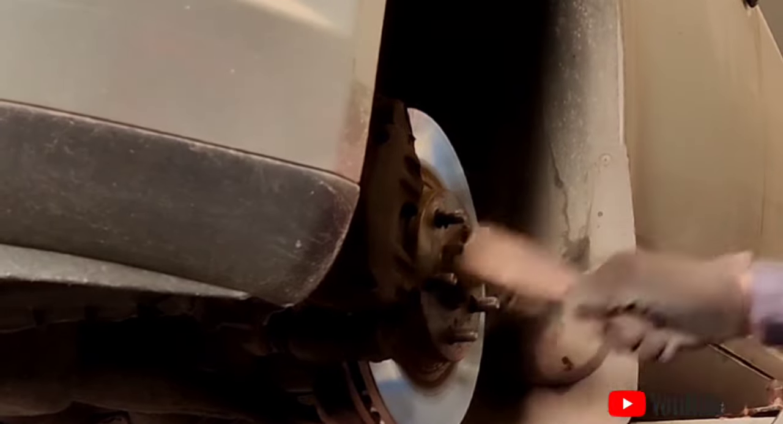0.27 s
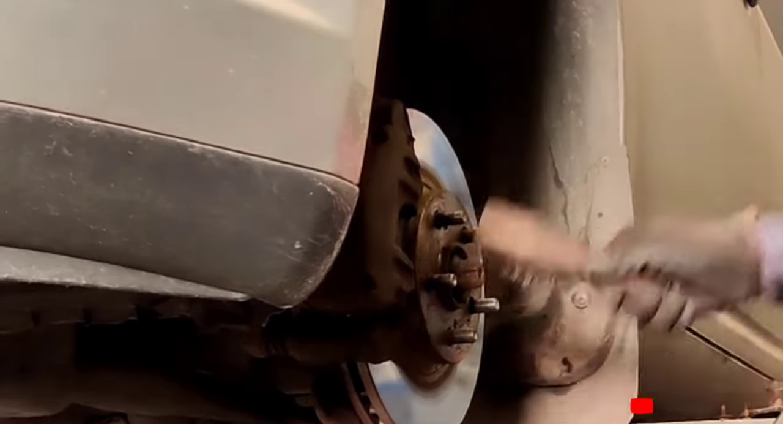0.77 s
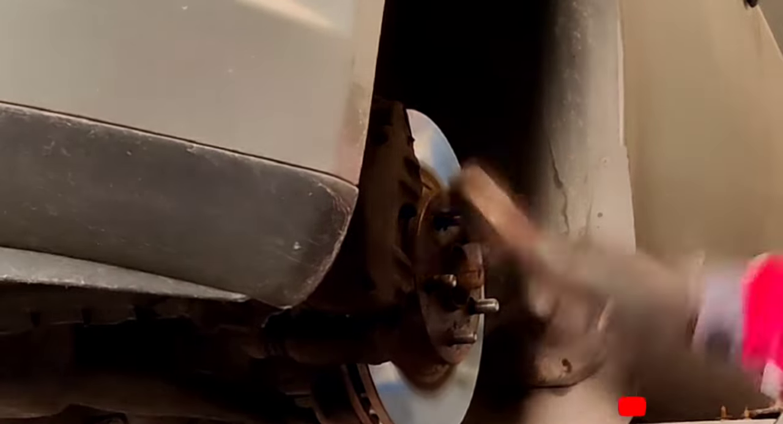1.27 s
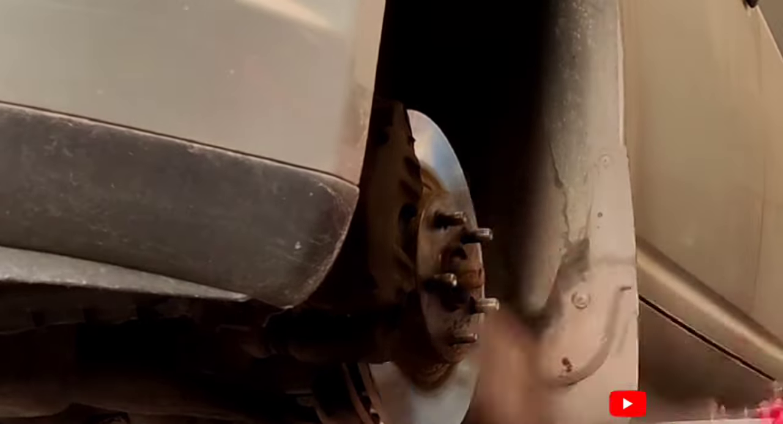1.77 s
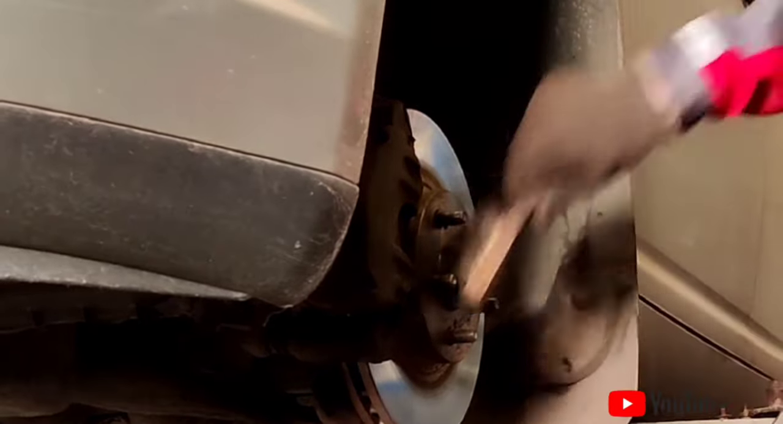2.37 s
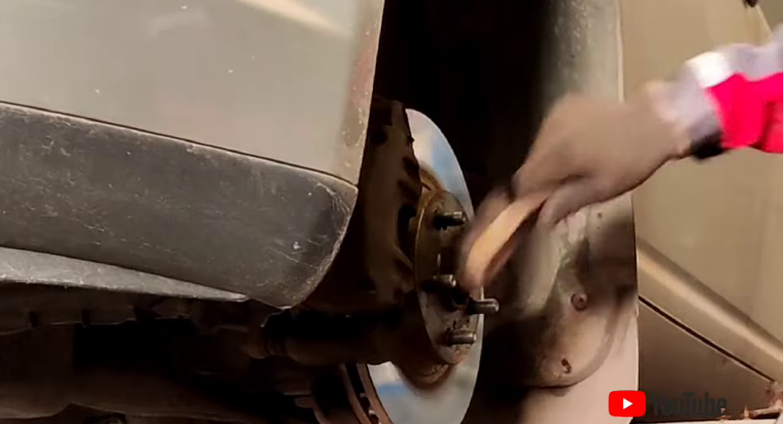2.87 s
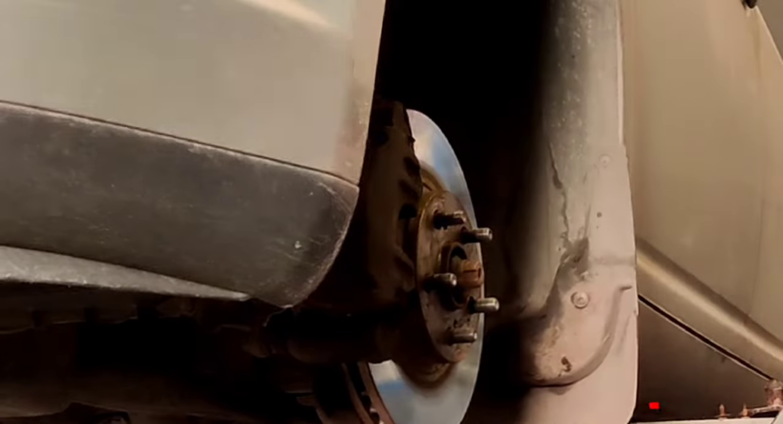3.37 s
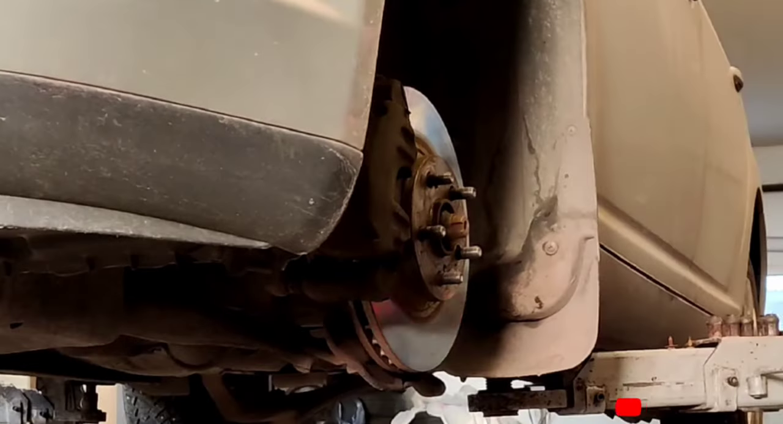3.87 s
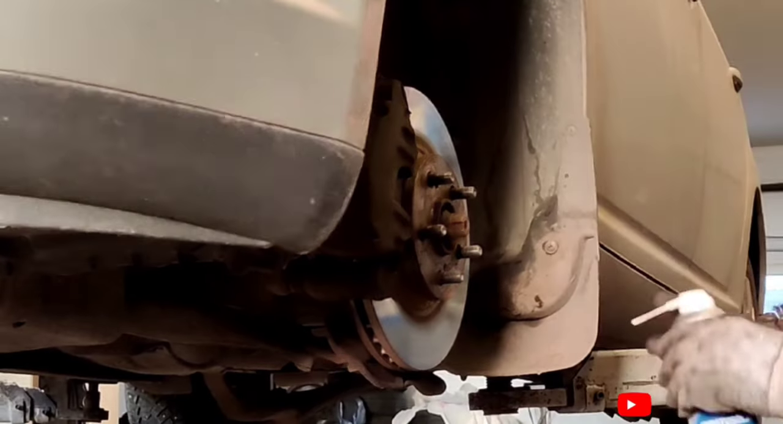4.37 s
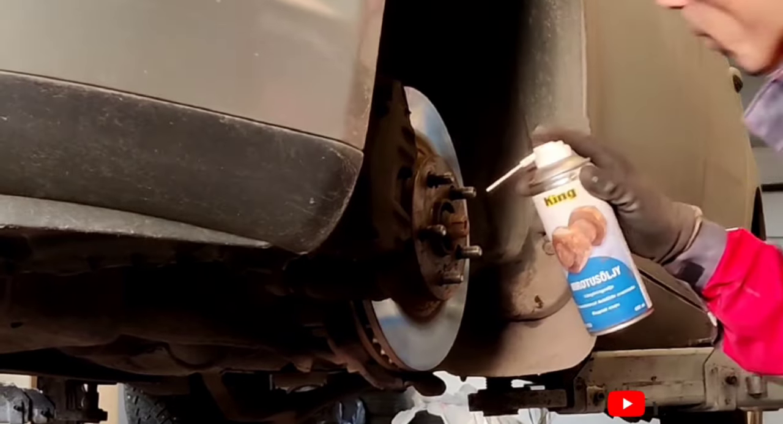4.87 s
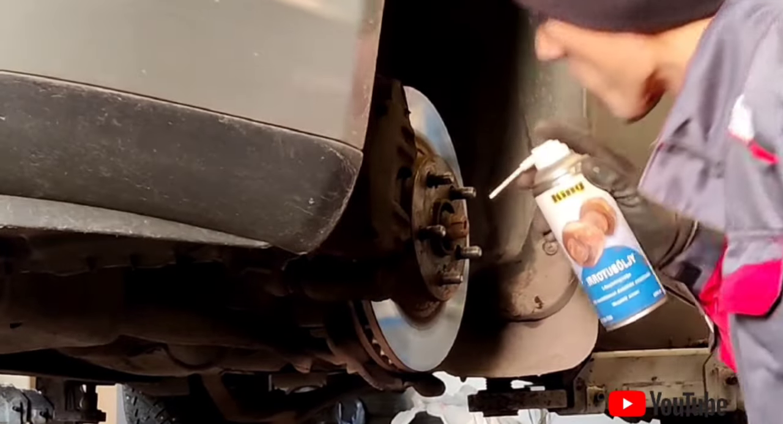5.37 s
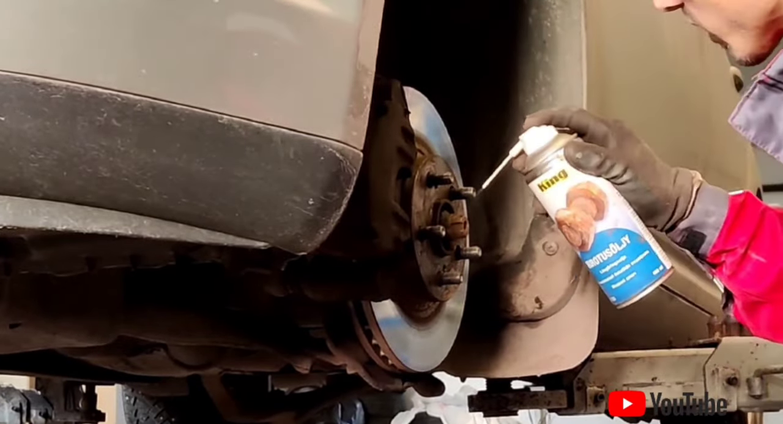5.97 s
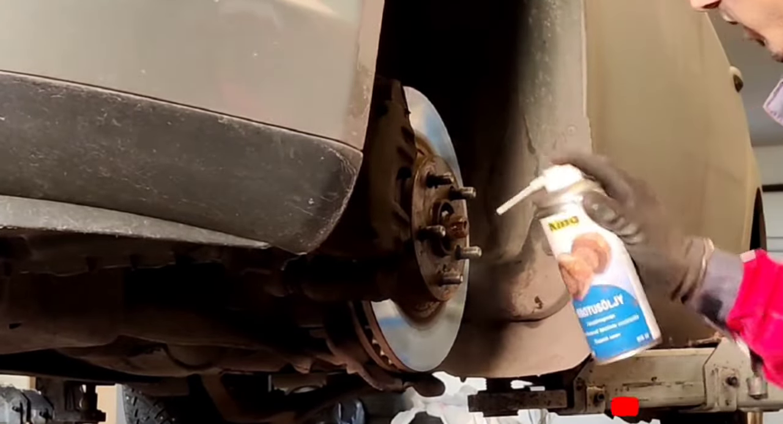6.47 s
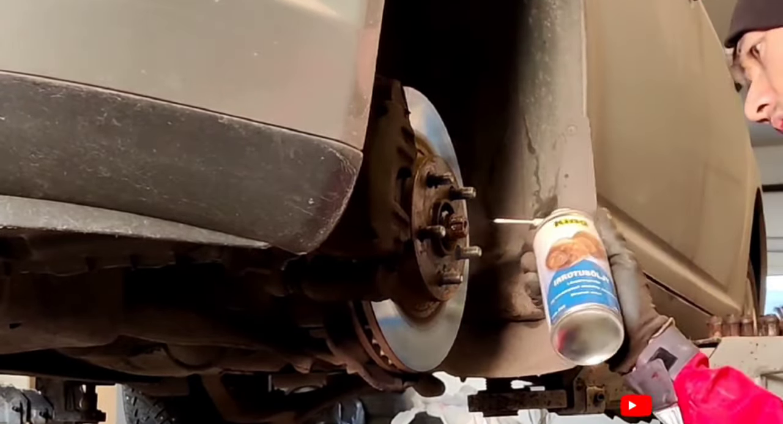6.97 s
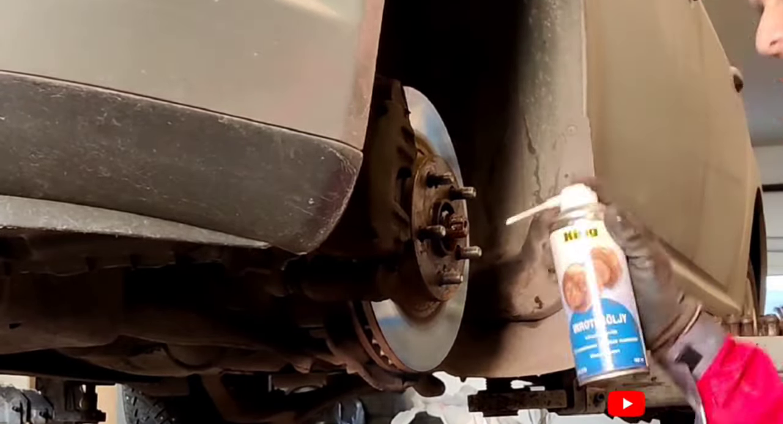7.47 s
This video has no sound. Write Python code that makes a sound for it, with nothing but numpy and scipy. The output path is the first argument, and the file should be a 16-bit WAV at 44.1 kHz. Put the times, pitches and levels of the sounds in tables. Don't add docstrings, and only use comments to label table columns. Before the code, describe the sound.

In a reverberant garage, a hand wire brush scrubs a rusty wheel hub with short raspy strokes, its wooden back clacking on studs and the iron ringing faintly. A car panel booms deeply, then come hard knocks and a longer, quicker scrub. After a tiny silent gap, a spray can rattles, cloth swishes and soft airy puffs follow. A low machine throb and hum lie underneath; the small microphone sounds slightly dull.

```python
import sys
import numpy as np
from scipy import signal
from scipy.fft import rfft, irfft, next_fast_len
from scipy.io import wavfile
from scipy.ndimage import uniform_filter1d, map_coordinates

SR = 44100
rng = np.random.default_rng(int(sys.argv[2]) if len(sys.argv) > 2 else 0)


def materialize(psi):
    bounded = np.clip(np.atleast_2d(psi).T, -1, 1)
    quanta = np.round(bounded * 32767).astype(np.int16)
    wavfile.write(sys.argv[1], SR, quanta)


def nominal_scale(level):
    x = np.asarray(level, float) / 20
    return 10 ** x


N = 339746

# (start [s], end [s])
SILENCE = (4.1879, 4.2177)
# (frequency [Hz], level [dB])
TOP_HISS = [(4710, -16), (8000, -1.5), (10400, -11.5), (11500, -7.5), (14500, -6), (15700, -22)]


def unit(x):
    return x / np.sqrt(np.mean(x ** 2) + 1e-20)


def along(points, hz):
    f, v = np.transpose(points)
    return np.interp(np.log(hz + 1), np.log(f + 1), v)


def curves(rows):
    s, *cols = np.transpose(rows)
    return [np.interp(np.arange(N) / SR, s, c) for c in cols]


def wobble(rate):
    knots = rng.standard_normal(int(N * rate / SR) + 4)
    return map_coordinates(knots, [np.arange(N) * rate / SR])


def filtered(x, response):
    m = next_fast_len(N + SR // 2)
    return irfft(rfft(x, m) * response(np.fft.rfftfreq(m, 1 / SR)), m)[:N]


def coloured(x, spectrum):
    return filtered(x, lambda hz: nominal_scale(along(spectrum, hz)))


def modes(table):
    def response(f):
        total = 0
        for k, (centre, width, db) in enumerate(table):
            total = total + (-1) ** k * nominal_scale(db) * 1j * f * width / (centre * centre - f * f + 1j * f * width)
        return total
    return response


def muffled(x, top_hz):
    return signal.sosfilt(signal.butter(6, top_hz, fs=SR, output="sos"), x)


def grit(spread_db, clump_db):
    size_db = spread_db * rng.exponential(size=N) + clump_db * (wobble(60) + wobble(250))
    return unit(rng.standard_normal(N) * nominal_scale(size_db))


def patchy(x, depth_db):
    z = signal.stft(x, nperseg=256)[2]
    field = uniform_filter1d(rng.standard_normal(z.shape), size=4, axis=0)
    field = uniform_filter1d(field, size=8, axis=1)
    return unit(signal.istft(z * nominal_scale(depth_db * unit(field)), nperseg=256)[1][:N])


def gesture(rise, hold, db_per_s, sag_db=0):
    t = np.arange(SR) / SR
    sag = sag_db * np.clip((t - rise) / max(hold, .002), 0, 1)
    fall_db = sag + db_per_s * np.maximum(t - rise - hold, 0)
    return np.sin(np.pi / 2 * np.clip(t / max(rise, .002), 0, 1)) ** 2 * nominal_scale(-fall_db)


def add(track, s, sound):
    part = track[round(s * SR):][:len(sound)]
    part += sound[:len(part)]


def hall():
    # (time [s], deep throb [dB], hum [dB])
    load = [(0.0, -42.5, -46), (0.32, -47.5, -48.5), (0.81, -39.5, -48.5), (1.16, -45, -45.5),
            (1.63, -45.5, -50.5), (1.84, -54, -42), (2.51, -39.5, -50.5), (3.22, -40.5, -45),
            (3.39, -30.5, -49), (3.95, -42.5, -49), (4.42, -46, -48.5), (4.82, -77, -47), (5.0, -44.5, -50),
            (5.9, -74, -44.5), (6.0, -47, -50.5), (6.28, -59.5, -50.5), (7.03, -61, -47.5),
            (7.7, -71, -50.5)]
    # (frequency [Hz], density [dB per Hz])
    hum_spectrum = [(24, -47), (40, -0.5), (68, 0), (77, -8.5), (86, -18), (98, -3.5), (118, -11),
                    (140, -19.5), (180, -57), (310, -120)]
    # (frequency [Hz], density [dB per Hz])
    air_spectrum = [(76, -48), (130, 0.5), (202, -10), (321, -27), (479, -22), (673, -13.5), (1200, -33),
                    (2580, -35), (5880, -31.5), (7780, -39.5), (8950, -48.5), (12700, -46.5), (13200, -57),
                    (15700, -66)]
    hum_sway_db, air_db, air_sway_db = 1, -61, 1
    throb_hz, throb_sway_hz = 27, 1
    throb_db, hum_db = curves(load) + hum_sway_db * wobble(3.24)
    noise = rng.standard_normal((3, N))
    phase = 2 * np.pi * np.cumsum(throb_hz + throb_sway_hz * wobble(8.2)) / SR
    throb = unit(np.sin(phase) * nominal_scale(0.58 * wobble(6.0)))
    hum = coloured(noise[1], hum_spectrum)
    hum /= np.sqrt(np.abs(uniform_filter1d(hum ** 2, size=SR // 4)))
    air_gain = nominal_scale(air_db + air_sway_db * wobble(3.5))
    air = air_gain * unit(coloured(patchy(noise[2], depth_db=2.2), air_spectrum))
    return nominal_scale(throb_db) * throb + nominal_scale(hum_db) * hum + air


def garage(x):
    # (frequency [Hz], t60 [s])
    decay = [(150, 0.64), (1000, 0.41), (3000, 0.62), (7000, 0.29), (14000, 0.16)]
    out, step = np.zeros(N + 2 * SR), SR // 8
    for start in range(0, N, step):
        hz, t, z = signal.stft(rng.standard_normal(SR // 2), SR, nperseg=256)
        t60 = np.maximum(along(decay, hz), .05)[:, None]
        tail = signal.istft(z * nominal_scale(-60 * t / t60), SR, nperseg=256)[1]
        tail = tail / np.linalg.norm(tail)
        add(out, start / SR + .004, signal.fftconvolve(x[start:start + step], tail))
    return out[:N]


def rustle():
    # (start [s], rise [s], hold [s], level [dB])
    swishes = [
        (4.325, 0.011, .01, -64),
        (4.51, .008, 0.12, -63),
        (4.594, 0.089, 0.0082, -56),
        (4.717, 0.033, 0.41, -65.5),
        (5.062, 0.02, 0.016, -55.5),
        (5.265, 0.055, 0.0078, -58),
        (5.471, .01, .002, -65.5),
        (5.582, 0.027, 0.0096, -51.5),
        (5.807, .01, .002, -71),
    ]
    # (start [s], rise [s], hold [s], level [dB], top hiss against it [dB])
    puffs = [
        (6.116, 0.017, 0.097, -64, -22),
        (6.336, 0.09, 0.041, -57.5, -12),
        (6.688, 0.038, 0.059, -61, -12),
        (6.92, 0.042, 0.047, -67.5, -34),
        (7.024, 0.034, 0.11, -76, -39),
        (7.195, 0.082, 0.065, -60.5, -16),
        (7.582, 0.038, 0.12, -60.5, -16),
    ]
    # (time [s], level [dB])
    shuffle = [(0.0, -44), (0.15, -48), (0.44, -59), (0.67, -50), (0.81, -44), (1.4, -48), (1.78, -55),
               (1.96, -56.5), (2.31, -56), (2.5, -58.5), (3.0, -55.5), (3.24, -61), (3.57, -53), (4.2, -59),
               (4.54, -53), (5.0, -63), (5.9, -64), (7.7, -64.5)]
    # (frequency [Hz], density [dB per Hz])
    cloth_spectrum = [(710, -19), (1200, -3), (1590, -1), (1760, -4), (2120, -3), (2670, -12), (3100, -8.5),
                      (3700, -7), (4020, -5), (4790, -5.5), (5900, -2.5), (8800, -33.5), (11400, -35),
                      (19400, -120)]
    # (frequency [Hz], density [dB per Hz])
    spray_spectrum = [(700, -7.5), (1060, -5), (2650, -12), (3090, -8.5), (4600, -8), (5500, -4),
                      (5980, 4.5), (6400, -3), (7300, -9), (9000, -28), (11700, -58)]
    # (frequency [Hz], density [dB per Hz])
    shoe_spectrum = [(120, -1), (200, 2), (389, -3), (658, -6.5), (1070, -14.5), (1540, -13.5), (2780, -19),
                     (4000, -23), (5200, -25), (8800, -120)]
    swish_db_per_s, puff_db_per_s = 198, 336
    swish_top_db = -23.5
    swish, puff, hiss = np.zeros((3, N))
    cloth = [(*row, swish_top_db) for row in swishes]
    for track, rows, db_per_s in (swish, cloth, swish_db_per_s), (puff, puffs, puff_db_per_s):
        for s, rise, hold, db, top_db in rows:
            add(track, s, nominal_scale(db) * gesture(rise, hold, db_per_s))
            add(hiss, s, nominal_scale(db + top_db) * gesture(1.55 * rise, hold - rise / 2, 2.3 * db_per_s))
    scuff = nominal_scale(curves(shuffle)[0] - 2.5)
    fine = patchy(grit(spread_db=.5, clump_db=.8), depth_db=2)
    coarse = patchy(grit(spread_db=1, clump_db=1.5), depth_db=2.5)
    air = swish * unit(coloured(fine, cloth_spectrum)) + puff * unit(coloured(fine, spray_spectrum))
    air = air + hiss * unit(coloured(fine, TOP_HISS))
    return air + scuff * unit(coloured(coarse, shoe_spectrum))


def scuffs():
    # (time [s], peak [dB], t60 [s], brightness [dB])
    contacts = [(0.014, -35.5, 0.24, -4.5), (0.961, -29, 0.073, -7), (1.593, -35, 0.37, -16),
                (1.699, -29, 0.38, -15), (2.982, -30.5, 0.053, -7.5), (3.406, -40, 0.098, -2),
                (3.961, -36, 0.071, 0.5), (5.066, -41, 0.36, -6), (5.269, -33.5, 0.051, -12),
                (5.29, -39.5, 0.22, -13.5), (5.597, -34.5, 0.17, -12.5), (0.729, -31, 0.2, -31),
                (0.801, -40, 0.11, -12), (4.62, -47, 1, -6.5)]
    dull, bright, t = np.zeros(N), np.zeros(N), np.arange(SR // 3) / SR
    for (s, db, t60, bright_db), chance in zip(contacts, rng.standard_normal((len(contacts), len(t)))):
        burst = nominal_scale(db + 5.5 - 60 * t / max(t60, .02)) * (1 - np.exp(-t / 0.006)) * chance
        add(dull, s - .002, burst)
        add(bright, s - .002, nominal_scale(bright_db) * burst)
    return filtered(muffled(dull, 1410) + muffled(bright, 3220), lambda f: f ** 2 / (f ** 2 + 250 ** 2))


def can():
    # (time [s], peak [dB])
    hits = [
        (4.336, -31),
        (4.356, -33.5),
        (4.39, -40),
        (4.503, -44),
    ]
    # (frequency [Hz], width [Hz], level [dB])
    tin = [(373, 62, 2.5), (770, 170, -4), (970, 110, -5.5), (1360, 125, -8), (1820, 410, -15.5),
           (2170, 190, -11.5), (3600, 180, -23)]
    contact, t = np.zeros(N), np.arange(SR // 8) / SR
    for (s, db), chance in zip(hits, rng.standard_normal((len(hits), len(t)))):
        add(contact, s - .002, nominal_scale(db + 15.5 - 60 * t / 0.17) * (1 - np.exp(-t / 0.0034)) * chance)
    return filtered(contact, lambda f: modes(tin)(f) / (1 + (f / 4200) ** 8))


def bumps():
    # (time [s], peak [dB], pitch [Hz], t60 [s])
    thuds = [(0.018, -39.5, 171.6, 0.14), (0.605, -35.5, 209.6, 1), (0.679, -32.5, 434, 0.22),
             (0.719, -22.5, 424, 0.073), (0.788, -33.5, 404, 0.17), (.83, -35.5, 480, 0.12),
             (2.1, -39, 186, 0.34), (0.97, -30, 165, 0.19), (1.301, -30, 103.3, 0.22),
             (2.152, -53, 470, 0.15), (3.879, -42.5, 151, 0.37), (3.875, -45.5, 323, 0.23),
             (4.09, -47, 209, 0.23), (4.399, -41, 363.6, 0.2), (4.519, -44.5, 397.4, 0.3),
             (5.487, -32, 107, 0.051), (5.598, -33.5, 285, 0.058), (5.61, -34.5, 553, 0.14)]
    # (time [s], peak [dB], pitch [Hz], t60 [s])
    boom = [
        (1.585, -15.5, 103.8, 0.39),
        (1.601, -20.5, 197.7, 0.16),
        (1.627, -21.5, 115.4, 0.36),
        (1.635, -19, 187.3, 0.26),
        (1.675, -16.5, 214, 0.052),
        (1.69, -33, 111, 0.14),
        (1.703, -30, 57, 0.57),
    ]
    out, t, rows = np.zeros(N), np.arange(SR // 2) / SR, [*thuds, *boom]
    for (s, db, hz, t60), (a, b) in zip(rows, rng.uniform(0, 2 * np.pi, (len(rows), 2))):
        tone = np.sin(2 * np.pi * hz * t + 0.97 * np.sin(2 * np.pi * 17 * t + a))
        tone = tone + 0.3 * np.sin(2 * np.pi * 1.4 * hz * t + b)
        envelope = nominal_scale(db - 3.0 - 60 * t / max(t60, .03)) * (1 - np.exp(-t / 0.00096)) ** 2
        add(out, s - .004, envelope * tone)
    return out


def pings():
    # (time [s], peak
    # [dB], pitch [Hz], t60 [s])
    ticks = [(.0144, -46, 6120, 0.032), (.042, -42, 4980, 0.062), (0.204, -32, 2780, 0.031),
             (0.3347, -44, 3300, .02), (0.3476, -33.5, 6000, 0.062), (.352, -38, 3220, 0.044),
             (0.495, -38, 6200, 0.046), (.6285, -31, 4870, 0.018), (0.628, -35, 2800, 0.016),
             (.768, -44, 6200, .03), (.814, -44, 3140, 0.049), (.82, -44, 4170, 0.018),
             (.9148, -42, 5800, .04), (0.916, -35, 3100, 0.026), (.9597, -49, 6120, 0.078),
             (1.0923, -22.5, 3130, 0.013), (1.091, -35.5, 6840, 0.023), (1.106, -20, 3230, 0.013),
             (1.231, -30, 5540, 0.024), (1.23, -33.5, 3130, 0.027), (1.271, -28, 2950, 0.03),
             (1.273, -34, 5880, 0.027), (1.4242, -41, 4880, 0.037), (1.4696, -36, 5700, 0.023),
             (1.6656, -36, 3090, 0.018), (1.695, -41, 5650, .03), (1.722, -32, 4960, 0.049),
             (1.725, -28, 5690, 0.035), (1.89, -36, 3350, 0.015), (1.923, -36, 5150, 0.017),
             (2.1014, -32, 2710, 0.02), (2.1246, -39, 4780, 0.037), (2.157, -25.5, 4880, 0.079),
             (2.145, -37, 4830, 0.07), (2.161, -27, 5660, .05), (2.101, -37, 5100, 0.025),
             (1.889, -39.5, 5100, 0.019), (2.373, -39.5, 4340, 0.045), (1.272, -32, 3550, 0.018),
             (2.3719, -29, 3100, 0.011), (2.383, -39, 5700, 0.035),
             (2.7462, -44, 5000, 0.044), (2.7477, -43, 6900, 0.027), (2.767, -36, 6700, 0.022),
                  (2.856, -41, 3230, .02), (2.984, -41, 5560, .04), (3.029, -47, 3240, .015),
                  (3.1852, -44, 6040, 0.026), (3.3812, -35, 5160, 0.019), (3.398, -38, 3370, 0.044),
                  (3.405, -36, 4200, 0.019), (3.476, -38, 3310, .02), (3.5204, -21, 3000, 0.014),
                  (3.543, -40.5, 5030, 0.11), (3.552, -39, 5550, 0.067), (3.559, -42.5, 6800, 0.053)]
    # (time [s], peak [dB], pitch [Hz], t60 [s])
    tinks = [(4.3406, -51, 3630, 0.073), (4.4274, -58, 3600, .05), (4.503, -50, 2170, 0.053),
             (4.5152, -57.5, 6000, 0.11), (4.676, -45, 3070, 0.033), (4.995, -49, 3430, 0.022),
             (5.0744, -48, 5100, .04), (5.29, -39, 1810, 0.025), (5.3209, -50, 3050, .02),
             (5.4616, -64.5, 2730, 0.022), (5.485, -54, 3180, 0.033), (5.603, -44, 3280, 0.053),
             (5.627, -46, 3300, 0.043), (5.606, -38, 1706, 0.048), (5.8098, -61, 5920, 0.055)]
    # (time [s], peak [dB], pitch [Hz], t60 [s], beat rate [Hz])
    rings = [(.155, -57, 4285, .4, 12), (1.728, -46, 4275, .4, 14), (1.722, -47, 5645, .3, 7),
             (2.165, -40, 4285, .22, 13), (1.81, -64, 4870, .4, 9), (.04, -49, 4870, .3, 17),
             (.03, -47, 5700, .25, 14), (3.53, -49, 5640, .3, 12), (1.715, -52, 6800, .25, 20),
             (1.735, -49, 4870, .15, 18), (2.21, -51, 5095, .2, 16), (2.2, -53, 5645, .3, 14),
             (2.16, -56, 6830, .25, 13), (3.52, -58, 4285, .6, 10), (1.945, -47, 5590, .2, 18)]
    beat_depth, waver_rad = .8, 1.3
    out, t, rows = np.zeros(N), np.arange(SR // 3) / SR, [*ticks, *tinks]
    for (s, db, hz, t60), chance in zip(rows, rng.standard_normal((len(rows), len(t)))):
        scratch = 1 + .5 * unit(uniform_filter1d(chance, size=60))
        envelope = nominal_scale(db - 60 * t / max(t60, .008)) * (1 - np.exp(-t / 0.0016))
        add(out, s - .001, envelope * scratch * np.sin(2 * np.pi * hz * t))
    for s, db, hz, t60, beat in rings:
        swell = 1 - beat_depth * np.cos(2 * np.pi * beat * t)
        waver = waver_rad * np.sin(2 * np.pi * beat_depth * beat * t)
        envelope = nominal_scale(db - 60 * t / max(t60, .05)) * (1 - np.exp(-t / 0.002))
        add(out, s, envelope * swell * np.sin(2 * np.pi * hz * t + waver))
    return out


def knocks():
    # (time [s], peak [dB], pitch [Hz], iron ring against it [dB], splinters and echo [dB])
    hits = [(0.161, -25.5, 1090, -20, 4.5), (0.205, -26, 784, -29, 3), (0.629, -19.5, 836, -25, -2),
            (0.633, -42, 900, -30, 1), (0.65, -31.5, 795, -30, 0), (0.727, -31.5, 920, -34, 7.5),
            (0.975, -27.5, 840, -26, 5), (1.095, -21, 790, -33, 5), (1.105, -26, 940, -26, 7),
            (1.112, -26, 760, -27, -2), (1.119, -34, 870, -29, 1), (1.23, -25.5, 850, -15, 1.5),
            (1.436, -50, 960, -28, 15.5), (1.666, -33.5, 960, -14, 7), (1.725, -33, 1110, -12, 14),
            (1.889, -28.5, 710, -21, 3.5), (1.927, -32.5, 930, -7, 4.5), (2.101, -23, 872, -23, 5.5),
            (2.104, -31.5, 960, -31, -5), (2.126, -25.5, 875, -25, -1), (2.13, -27, 786, -29, 3),
            (2.161, -15, 1260, -28, 2), (2.1641, -21.5, 1230, -31, -7), (2.176, -24, 810, -28, 2.5),
            (2.185, -25.5, 1010, -31, 7.5), (2.195, -27.5, 800, -35, 6.5), (2.371, -28.5, 970, -15.5, 6.5),
            (3.38, -48, 935, 7, 5), (3.507, -36, 800, -21, 3), (3.521, -18, 1000, -35, 3.5),
            (3.536, -33.5, 1030, -34, 3), (5.32, -35.5, 810, -20, 5.5), (5.488, -40, 450, -24, 0),
            (5.601, -32, 614, -20, -10), (5.617, -32.5, 710, -20, -7), (5.625, -33.5, 633, -20, 4.5)]
    # (frequency [Hz], level [dB], t60 [s])
    struck = [(3284, -10, .12), (4285, -4, .22), (4880, -4, .18), (5090, -5, .18), (5645, -3, .2),
              (5800, -9, .12), (6830, -6, .25)]
    # (frequency [Hz], width [Hz], level [dB])
    wood = [(504, 510, 4), (960, 350, 7), (1340, 327, 3), (2050, 670, 0.5), (2590, 950, -3.5),
            (3300, 1100, -11)]
    splinter_rise_s, rattle_db = .003, 3
    blow_db = 19.5
    clack_echo = .15
    (dry, wet, ring, blows), t = np.zeros((4, N)), np.arange(SR // 3) / SR
    hub_hz, hub_db, hub_t60 = np.transpose(struck)[:, :, None]
    for (s, db, hz, ring_db, echo_db), chance in zip(hits, rng.standard_normal((len(hits), len(t)))):
        swell = (t / 0.00061) ** 2 * np.exp(2 - 2 * t / 0.00079)
        body = np.sin(2 * np.pi * hz * t) + 0.39 * np.sin(2 * np.pi * 1.93 * hz * t)
        body = body + 0.061 * np.sin(2 * np.pi * 3.57 * hz * t)
        add(dry, s + .0003, nominal_scale(db - 1) * swell * body)
        burst = nominal_scale(db + echo_db - 0.5 - 60 * t / 0.035) * (1 - np.exp(-t / splinter_rise_s)) * chance
        add(wet, s + 0.00125, burst)
        add(blows, s, nominal_scale([db + echo_db - 7.5]))
        spot_db = 2.7 * chance[:len(struck), None]
        tones = nominal_scale(hub_db + spot_db - 60 * t / hub_t60) * np.sin(2 * np.pi * hub_hz * t)
        tones = tones * (1 + .6 * np.cos(2 * np.pi * (14 + 5 * spot_db) * t))
        on_hub = s < SILENCE[0]
        add(ring, s, on_hub * nominal_scale(db + ring_db - 12.0) * (1 - np.exp(-t / 0.001)) * tones.sum(axis=0))
    woody = lambda x: filtered(muffled(x, 5000), modes(wood))
    splinters = woody(wet * nominal_scale(rattle_db * wobble(180)))
    wake = clack_echo * dry + nominal_scale(blow_db) * woody(blows) + 0.38 * ring
    return dry + splinters + ring, wake


def brush():
    # (start [s], length [s], bristle level [dB], iron ring against it [dB], top hiss against it [dB])
    strokes = [(.004, 0.061, -43, 0, -19.5), (.155, 0.053, -45, -9, -20), (0.287, 0.03, -56, -18, -26),
               (0.322, 0.058, -46, -29, -19.5), (0.474, 0.053, -50.5, -17, -12.5),
               (0.604, 0.018, -51.5, -5, -15), (0.713, 0.035, -57.5, 1, -16),
               (0.946, 0.052, -44.5, -10, -27), (1.083, 0.0063, -38, -25, -40),
               (1.226, 0.045, -50, -25, -19.5), (1.414, 0.041, -47.5, -16, -19),
               (1.493, 0.07, -62.5, 8, -22), (1.651, 0.019, -56, -6, -31), (1.684, 0.03, -47, 4.5, -18),
               (1.878, 0.016, -50.5, 1, -20), (1.917, 0.054, -45, -0.5, -16.5),
               (2.092, 0.058, -47.5, -12, -19), (2.132, 0.034, -41, -17, -32),
               (2.379, 0.059, -48.5, -21, -16), (2.572, 0.041, -55, -9, -23), (2.713, 0.57, -57, 5.5, -21),
               (3.386, 0.088, -53, -11, -16.5), (3.508, 0.064, -49.5, 2.5, -15.5),
               (3.823, 0.19, -64.5, -21, -31), (3.929, 0.039, -53.5, -5, -20)]
    # (peak time [s], peak [dB], top hiss against it [dB])
    flicks = [(0.355, -44.5, -17), (.63, -49, -16), (.769, -53, -11), (.82, -49, -16), (0.859, -46, -11),
              (0.917, -44, -14), (1.28, -48.5, -9), (1.468, -48.5, -15), (1.726, -39, -26),
              (2.645, -65, -15), (2.748, -46.5, -12), (2.772, -59, -13), (2.805, -53, -17),
              (2.86, -52.5, -12), (2.883, -54, -13), (2.93, -50.5, -12), (2.981, -45.5, -13),
              (3.03, -55, -9), (3.048, -56, -13.5), (3.09, -49, -16), (3.135, -57, -14),
              (3.195, -44.5, -20), (3.264, -52, -13), (3.385, -54, -29), (3.408, -43.5, -18),
              (3.476, -67, -15), (4.163, -61, -15)]
    # (frequency [Hz], width [Hz], level [dB])
    iron = [(3280, 110, -12), (4280, 65, -5), (4870, 55, 1), (5095, 40, -3), (5620, 80, -1), (5800, 50, -6),
            (6830, 80, -2)]
    # (frequency [Hz], density [dB per Hz])
    bristles = [(880, -10.5), (1500, -13.5), (2450, -10), (3260, -5), (3810, -9.5), (4200, -6), (4550, -8),
                (4900, -7.5), (5770, -2), (6940, -14), (8800, -40), (11400, -33), (19400, -120)]
    press_s, sag_db, lift_db_per_s = 0.017, 3, 494
    spring_db, spring_db_per_s = -4, 88.5
    hiss_spring_db = -13.5
    flick_s, flick_ring_db = 0.012, -9
    pressure, ringing, hiss = np.zeros((3, N))
    for s, length, db, ring_db, top_db in strokes:
        rub = gesture(press_s, length, lift_db_per_s, sag_db)
        spring = gesture(press_s, length, spring_db_per_s, sag_db)
        push = rub + nominal_scale(spring_db) * spring
        add(pressure, s, nominal_scale(db - 5) * push)
        add(ringing, s, nominal_scale(db - 7.5 + ring_db) * push)
        add(hiss, s, nominal_scale(db + top_db) * (rub + nominal_scale(hiss_spring_db) * spring))
    u = np.arange(SR // 8) / SR / flick_s
    for s, db, top_db in flicks:
        for track, rel_db in (pressure, 0), (ringing, flick_ring_db), (hiss, top_db):
            add(track, s - flick_s, nominal_scale(db - 6.0 + rel_db) * u * np.exp(1 - u))
    slips = patchy(grit(spread_db=1.9, clump_db=2.2), depth_db=1.5)
    dust = patchy(rng.standard_normal(N), depth_db=3)
    rasp = pressure * unit(coloured(slips, bristles)) + hiss * unit(coloured(dust, TOP_HISS))
    bites = grit(spread_db=2, clump_db=2.5)
    ring_scale = np.std(filtered(bites, modes(iron)))
    ring = filtered(ringing * bites, modes(iron)) / ring_scale
    return rasp + muffled(ring, 6460)


def scene():
    scrub, thuds, tin, drags = brush() + pings(), bumps(), can(), scuffs()
    clacks, wake = knocks()
    sent = nominal_scale(-14.5) * scrub + nominal_scale(5.5) * wake + nominal_scale(-4.5) * thuds + nominal_scale(-8.0) * tin + nominal_scale(-5.0) * drags
    echo = garage(sent)
    return (scrub + rustle() + clacks + thuds + tin + drags + echo + hall())[None]


def thinned(x):
    from_hz, share_sigma = 8100, .75
    hz, _, z = signal.stft(x, SR, nperseg=1024)
    field = uniform_filter1d(rng.standard_normal(z.shape), size=3, axis=0)
    field = unit(uniform_filter1d(field, size=9, axis=1))
    kept = (field < share_sigma) | (hz < from_hz)[:, None]
    return signal.istft(z * kept, SR, nperseg=1024)[1][:N]


def low_pass(x):
    return signal.sosfilt(signal.butter(12, 16430, fs=SR, output="sos"), x)


def record(dry):
    s = np.arange(N) / SR
    dry = filtered(thinned(dry[0]), lambda hz: hz < 15700)[None]
    stop_s, start_s = SILENCE
    stop, start = dry[0, round(stop_s * SR)], dry[0, round(start_s * SR)]
    before = (s < stop_s) * (dry + (.003 - stop) * np.exp(-np.abs(s - stop_s) / .006))
    after = (s > start_s) * (dry + (.018 - start) * np.exp(-np.abs(s - start_s) / .006))
    return low_pass(before + after)


dry = scene()
out = record(dry)
materialize(out)
```